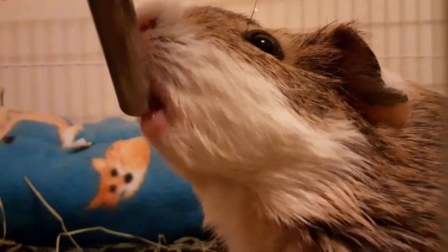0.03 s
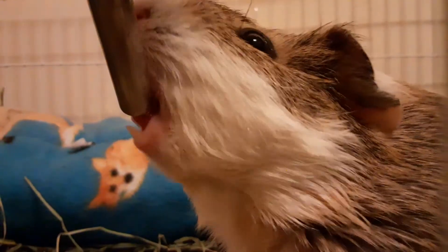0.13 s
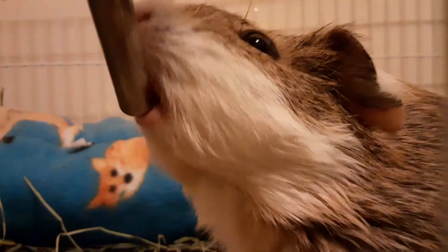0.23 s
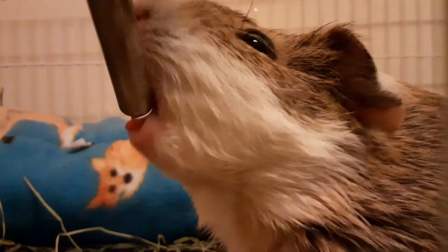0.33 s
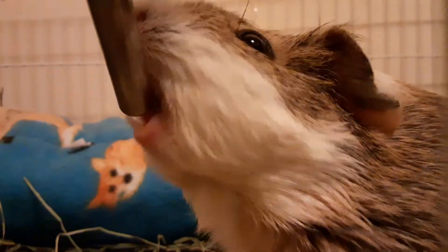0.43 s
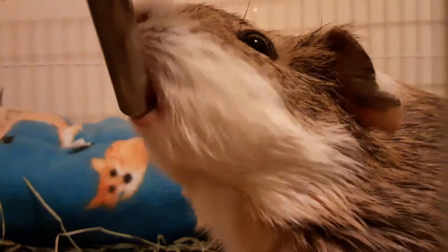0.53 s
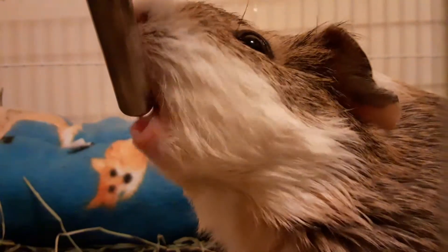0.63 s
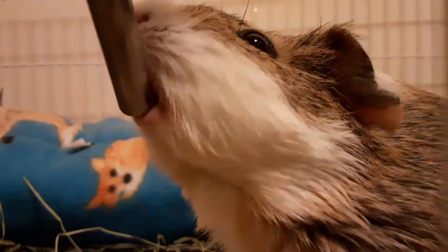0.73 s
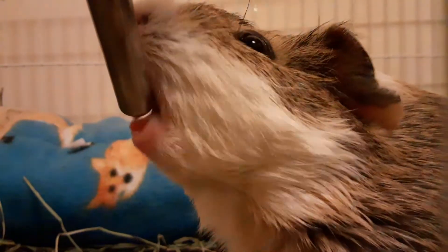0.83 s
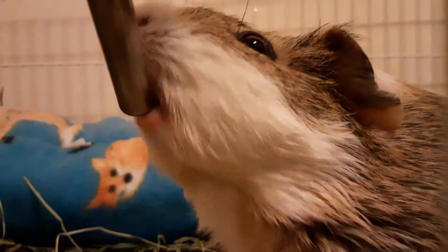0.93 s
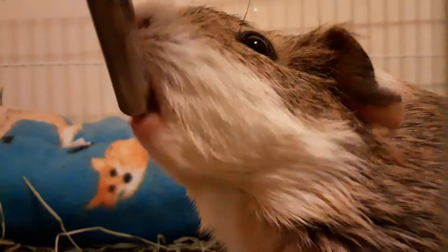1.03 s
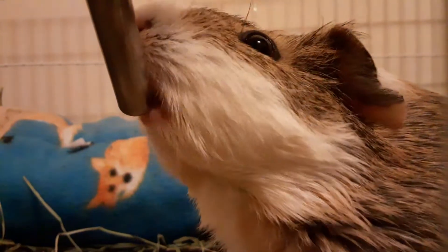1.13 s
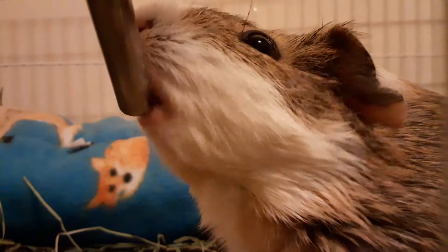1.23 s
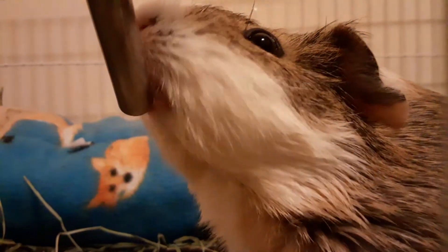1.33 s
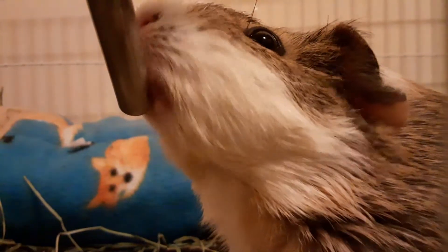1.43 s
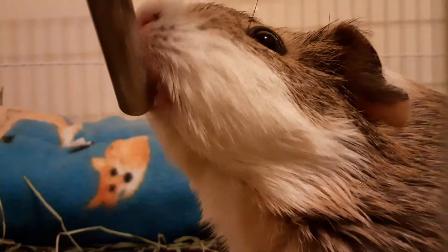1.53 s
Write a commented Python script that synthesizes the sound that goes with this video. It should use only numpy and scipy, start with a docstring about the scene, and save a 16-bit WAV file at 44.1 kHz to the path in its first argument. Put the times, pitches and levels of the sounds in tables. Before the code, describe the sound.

Rapid metallic ticking comes from a water bottle tube as a guinea pig drinks close to the microphone. The bottle rattles lightly on the cage, then the clicks stop with a few soft low bumps over faint room hum.

```python
"""A guinea pig licks the ball valve of a metal drinking spout, close to a two-port microphone.
Quiet room hum and a faint treble rustle run throughout. From 0.14 to 1.17 s the steel ball ticks
in the spout and rings it; harder pushes knock the bottle against the cage wire.
A soft low bump comes at 1.04 s, the bottle's low ring lingers from 1.14 s, and two more bumps
follow at 1.35 and 1.38 s; hum and rustle remain to 1.6 s."""
import sys
import numpy as np
from scipy import signal
from scipy.fft import rfft, irfft, next_fast_len
from scipy.io import wavfile
from scipy.ndimage import map_coordinates

SR = 44100
rng = np.random.default_rng(int(sys.argv[2]) if len(sys.argv) > 2 else 0)


def wav_record(signal):
    """Record a signal, one row per channel, as 16-bit PCM in the file named by sys.argv[1]."""
    frames = np.transpose(np.atleast_2d(signal))
    bounded = np.clip(frames, -1, 1)
    # unit amplitude maps onto the largest positive 16-bit level
    quanta = np.round(bounded * 32767).astype(np.int16)
    wavfile.write(sys.argv[1], SR, quanta)


N = 70560


def amp(db):
    """dB to gain."""
    return 10 ** (np.asarray(db) / 20)


def unit(x):
    """x at rms 1."""
    return x / np.sqrt(np.mean(x ** 2) + 1e-20)


def along(points, hz):
    """Interpolate (Hz, value) points on a log frequency axis."""
    point_hz, values = np.transpose(points)
    return np.interp(np.log(hz + 1), np.log(point_hz + 1), values)


def filtered(x, response):
    """Zero-phase filter with gain response(hz)."""
    n = x.shape[-1]
    padded = next_fast_len(n + 8192)
    return irfft(rfft(x, padded) * response(np.fft.rfftfreq(padded, 1 / SR)), padded)[..., :n]


def hiss(colour, size):
    """Two independent coloured noises, rms 1."""
    hz = np.fft.rfftfreq(size, 1 / SR)
    return unit(irfft(rfft(rng.standard_normal((2, size))) * amp(along(colour, hz)), size))


def burst(t, colour, rise_s, t60_s):
    """Noise burst with the energy of its peak-1 envelope."""
    age_s = t[:2048]
    envelope = amp(-60 * age_s / max(t60_s, 0.002)) * (1 - np.exp(-age_s / max(rise_s, 0.00005)))
    envelope /= envelope.max()
    noise = envelope * hiss(colour, len(age_s))
    noise *= np.linalg.norm(envelope) / np.linalg.norm(noise, axis=1, keepdims=True)
    return np.pad(noise, [(0, 0), (0, len(t) - len(age_s))])


def dying(noise, decay):
    """Noise with a frequency-dependent t60."""
    hz, t, spectra = signal.stft(noise, SR, nperseg=128)
    spectra *= amp(-60 * t / along(decay, hz)[:, None])
    return signal.istft(spectra, SR, nperseg=128)[1][:, :noise.shape[1]]


def ring(modes, t, rise_s):
    """Damped modes, struck nearly in phase at random strengths; low modes waver less in phase."""
    scatter_db, spread_rad, min_rise_s = 1.4, 0.85, 0.00034
    waver_rad, waver_rate_hz, full_waver_hz = 1.96, 252, 8600
    hz, db, t60_s = np.transpose(modes)[:, :, None]
    db = db + scatter_db * rng.standard_normal(db.shape)
    knots = rng.standard_normal((2, len(modes), 100))
    start_rad = np.pi + spread_rad * rng.standard_normal(db.shape)
    age_s = t[t < t60_s.max()]
    position = np.clip(age_s * waver_rate_hz, 0, 98)
    k = position.astype(int)
    wander = knots[..., k] * (1 - position + k) + knots[..., k + 1] * (position - k)
    depth_rad = waver_rad * np.minimum(hz / full_waver_hz, 1) ** 0.82
    swing = np.sin(2 * np.pi * hz * age_s + start_rad + depth_rad * wander)
    ringing = (amp(db - 60 * age_s / t60_s) * swing).sum(axis=1)
    attack = 1 - np.exp(-age_s / max(rise_s, min_rise_s))
    return np.pad(ringing * attack, [(0, 0), (0, len(t) - len(age_s))])


def room_hum():
    """Room tone, alike at both ports only in the bass."""
    # spectrum (frequency [Hz], level [dB])
    colour = [(15, -43), (25, -26), (60, -10), (115, -13.5), (160, -12.5), (185, -8.5), (250, -11.5),
              (340, -2.5), (390, -14.5), (440, -6), (600, -16), (800, -13.5), (1100, -23.5), (1500, -12.5),
              (2500, -18.5), (4000, -27.5), (6000, -44), (12000, -115), (16000, -60)]
    # left-right likeness (frequency [Hz], correlation before clipping [-])
    likeness = [(60, 0.79), (240, 0.77), (950, -0.036), (3770, 0.0097), (15000, -1.4)]

    def mid_side_gains(hz):
        angle_rad = np.arccos(np.clip(along(likeness, hz), -1, 1)) / 2
        return np.array([np.cos(angle_rad), np.sin(angle_rad)])

    mid, side = filtered(hiss(colour, N), mid_side_gains)
    return amp(-52.5) * unit(np.array([mid + side, mid - side]))


def room_echo(direct):
    """Reverberation: a mono sound convolved with a decaying noise per port."""
    # room decay (frequency [Hz], t60 [s])
    decay = [(300, 0.34), (1500, 0.16), (5000, 0.22), (10000, 0.12), (16000, 0.11)]
    n = len(direct)
    tail = dying(rng.standard_normal((2, n)), decay)
    echo = irfft(rfft(direct, 2 * n) * rfft(tail, 2 * n))[:, :n]
    return amp(-10) * echo / np.linalg.norm(tail[0])


def rustle():
    """Grainy treble noise that swells and reaches lower as the animal moves."""
    # swells (time [s], level [dB])
    swells = [(0.0, -61.5), (0.186, -58.5), (0.27, -46.5), (0.4, -58), (0.534, -51), (0.646, -55.5),
              (0.766, -48), (0.918, -58), (0.979, -46), (1.09, -63), (1.22, -59.5), (1.3, -52.5),
              (1.335, -50.5), (1.38, -56.5), (1.6, -60.5)]
    # treble spectrum (frequency [Hz], level [dB])
    treble_colour = [(2000, 3), (6000, -5.5), (9000, -14), (12000, -1.5), (15000, 7), (16500, 0.5)]
    # lower spectrum (frequency [Hz], level [dB])
    lower_colour = [(3000, -20), (7000, -10.5), (9500, 1), (12000, -18), (16500, -7.5)]
    flicker_hz, flicker_db = 150, 1.66
    t = np.arange(N) / SR
    swell_s, swell_db = np.transpose(swells)
    level_db = np.interp(t, swell_s, swell_db)
    flicker = map_coordinates(rng.standard_normal(400), [t * flicker_hz])
    lower = amp(-12.5 + 1.17 * (level_db - swell_db.mean())) * hiss(lower_colour, N)
    return amp(level_db + flicker_db * flicker) * (hiss(treble_colour, N) + lower)


def low_bumps_and_bottle_ring():
    """Three soft low bumps and the bottle's lingering low ring, one damped sine each."""
    # low tones (time [s], level [dB], frequency [Hz], t60 [s])
    tones = [(1.041, -46.5, 140, 0.12), (1.141, -47, 235, 0.31), (1.349, -39, 131, 0.053),
             (1.376, -44.5, 112, 0.047)]
    out = np.zeros(N)
    for start_s, db, hz, t60_s in tones:
        age_s = np.maximum(np.arange(N) / SR - start_s, 0)
        out -= amp(db - 60 * age_s / t60_s) * np.sin(2 * np.pi * hz * age_s)
    return out


def bottle_thud(t):
    """Low bottle modes, slow to build, slightly louder on the left."""
    # bottle modes (frequency [Hz], level [dB], t60 [s])
    modes = [(131.4, -7.5, 0.17), (231.2, 1.5, 0.11), (298.5, -3.5, 0.16), (367.2, 7, 0.13)]
    return ring(modes, t, rise_s=0.0052) * amp([[0.3], [-0.3]])


def wire_knock(t, rise_s):
    """Bottle hits cage wire: a sharp pressure dip and a clack, then ringing and buzz."""
    # wire modes (frequency [Hz], level [dB], t60 [s])
    modes = [(1031, -6, 0.076), (1374, 6, 0.064), (1492, 6.5, 0.04), (1626, 0, 0.076), (2250, -21, 0.023),
             (2531, -1, 0.054), (2630, -4, 0.12), (2970, -7.5, 0.12), (3170, -9.5, 0.12), (3592, 7, 0.029),
             (3960, -2, 0.07), (4640, 0, 0.043), (4780, -15, 0.067), (5550, -5, 0.04), (6340, 4, 0.04),
             (8660, -2, 0.043)]
    # clack and buzz spectrum (frequency [Hz], level [dB])
    colour = [(150, -17.5), (400, -6), (900, -24), (1400, -6.5), (3000, 1), (6000, 0), (8500, -3),
              (10500, -26), (14000, 0.5), (16500, -24)]
    # buzz decay (frequency [Hz], t60 [s])
    decay = [(300, 0.46), (1400, 0.2), (4000, 0.11), (8000, 0.04), (16000, 0.024)]
    dip_width_s = 0.0001094
    offset = t / dip_width_s - 3
    dip = amp(13.5) * (2 * offset ** 2 - 1) * np.exp(-offset ** 2)
    clack = amp(11) * burst(t, colour, rise_s, t60_s=0.01)
    buzz = amp(1.94) * dying(hiss(colour, len(t)), decay)
    return dip + clack + ring(modes, t, rise_s) + buzz


def tube_hollow(t, rise_s):
    """Hollow resonance of the water-filled tube."""
    # tube modes (frequency [Hz], level [dB], t60 [s])
    modes = [(1496, 12.1, 0.013), (1804, 6.2, 0.029), (2050, 3.3, 0.021), (2400, 1.3, .016)]
    return ring(modes, t, rise_s)


def spout_ring(t, rise_s, low_db, mid_db, top_db):
    """The struck metal spout rings in three treble clusters."""
    # spout modes, each table (frequency [Hz], level [dB], t60 [s])
    low_modes = [(10480, 9, 0.025), (10420, -20, 0.081), (10340, 10, 0.035), (10550, 6, 0.023)]
    mid_modes = [(11500, -10, 0.026), (12340, 3.5, 0.026), (11850, -4, 0.027), (13300, -8, 0.038)]
    top_modes = [(13600, -23, 0.025), (14100, 9, 0.032), (13700, -4, .03), (14480, -10, 0.096)]
    clusters = [(low_db, low_modes), (mid_db, mid_modes), (top_db, top_modes)]
    return sum(amp(db) * ring(modes, t, rise_s) for db, modes in clusters)


def ball_tick(t, rise_s, t60_s, tick_db, pop_db):
    """Steel ball hits the spout: a bright burst and a pop, a pressure dip with a slower rebound."""
    # tick spectrum (frequency [Hz], level [dB])
    colour = [(200, -36), (1000, -25), (4000, -31), (9000, -13), (11500, -17.5), (14200, -1.5), (16500, -9)]
    dip_width_s, rebound_s = 0.00005, 0.00065
    dip = np.exp(-(t / dip_width_s - 3) ** 2)
    rebound = t * np.exp(-t / rebound_s)
    pop = rebound * dip.sum() / rebound.sum() - dip  # zero mean
    return amp(tick_db) * burst(t, colour, rise_s, t60_s) + amp(pop_db) * pop


def licking():
    """Each ball contact excites spout, tube, wire, bottle and room; the right port hears it later."""
    # ball contacts (time [s], tick [dB], rise [s], tick t60 [s], pop [dB], low ring [dB],
    # mid ring [dB], top ring [dB], hollow [dB], knock [dB], thud [dB], left over right [dB])
    contacts = [(0.1375, -47, 0.0001, 0.0043, -41, -85, -72.0, -65, -83, -75, -60, 2.0),
                (0.1843, -41, 0.0002, 0.0067, -30, -54, -46, -53, -49, -54, -76, 1.7),
                (0.194, -36, 0.0017, 0.014, -28.5, -65.0, -45, -56.0, -67, -63, -61, 19.4),
                (0.2011, -6.5, 0.00027, 0.0027, -19, -56, -35, -45.0, -64, -47.5, -52.5, 12.3),
                (0.214, -15.5, 0.00032, 0.017, -23, -52, -50.0, -40, -62.0, -46, -44, 2.8),
                (0.2329, -10.5, 0.000091, 0.0019, -15, -39.5, -55, -40, -41.5, -49.5, -76, 16.6),
                (0.2452, -18.5, 0.00017, 0.0083, -36, -43, -58.0, -48.0, -41, -58, -43, 4.4),
                (0.272, -35, 0.00017, 0.006, -44, -60, -64, -62, -68, -59, -71, 9.7),
                (0.3063, -34, 0.00031, 0.0055, -15.5, -40, -36, -43.0, -64, -30, -45, 9.7),
                (0.3119, -14, 0.00043, 0.0034, -13.5, -37.5, -40, -42, -63, -39.5, -39, 5.3),
                (0.3133, -24, 0.0007, 0.0039, -32, -39, -35, -50, -63, -36.5, -42.5, 1.7),
                (0.3145, -19, 0.0002, 0.004, -30, -51, -50, -55, -62, -44, -59, 5),
                (0.3233, -36, 0.0014, 0.011, -37.0, -55.0, -55.0, -56.0, -65, -55, -58, 1.5),
                (0.4358, -43.0, 0.00014, 0.006, -28.5, -55, -59, -55, -51, -55, -47.5, 7.6),
                (0.44, -31.5, 0.0014, 0.0066, -38, -58.0, -55.0, -59.0, -67, -55.5, -52, 14.5),
                (0.454, -28, 0.00066, 0.012, -50, -59, -52, -53, -62, -48, -60, 4.7),
                (0.4603, -6.5, 0.00012, 0.0017, -13.5, -46, -57, -55, -80, -47.5, -51, 13.2),
                (0.4721, -19, 0.00023, 0.0065, -32, -45, -61, -48, -48, -62, -45.5, 7.3),
                (0.4768, -43, 0.0029, 0.012, -43, -37, -57.0, -53, -42, -48, -47, 1.4),
                (0.516, -33, 0.009, 0.016, -39, -62.0, -57, -55.0, -79, -51.5, -53, 7.7),
                (0.529, -34, 0.00022, 0.006, -37, -72.0, -66.0, -68, -71, -64, -77, 5.9),
                (0.5737, -20.5, 0.00022, 0.0089, -41, -46, -35, -43, -36, -35.5, -43.5, 11.4),
                (0.5796, -13.5, 0.00015, 0.0087, -29, -35.5, -42, -30, -51, -34, -42, 2.8),
                (0.5821, -33, 0.0002, 0.005, -47, -60, -55, -55, -48, -44, -65, 6.8),
                (0.587, -49, 0.002, 0.011, -49, -63, -59, -50, -53, -53, -52, 4.4),
                (0.675, -30, 0.0015, 0.0039, -23.5, -71, -64, -57, -50, -52, -62, 3.4),
                (0.6816, -10.5, 0.00013, 0.0033, -14.5, -46, -54, -56.0, -50, -52, -50, 14.6),
                (0.6987, -16, 0.0004, 0.0048, -31, -40, -56.0, -54.0, -45, -50.5, -61, 11),
                (0.711, -14, 0.00022, 0.01, -14, -36, -57, -48, -35, -45, -43, 11.2),
                (0.7287, -18.5, 0.00026, 0.0039, -25, -36, -56, -47.0, -42, -56, -54, 4.6),
                (0.7933, -21, 0.00041, 0.0093, -32, -41, -48.0, -40, -62, -32, -47, 13),
                (0.7987, -15.5, 0.0012, 0.0046, -20, -35.5, -41, -46, -51, -34.5, -43, 11.5),
                (0.8001, -17.5, 0.00042, 0.0052, -14, -35, -51, -46.0, -45, -36, -39, 3.8),
                (0.8037, -38, 0.0002, 0.004, -32, -55, -55, -55, -64, -48, -75, 5.3),
                (0.8102, -46, 0.0032, 0.012, -44, -59, -57, -48, -61, -47, -51, 3),
                (0.902, -27, 0.0011, 0.012, -22, -48, -28, -48.0, -57, -50, -60, 10),
                (0.9086, -12.5, 0.00021, 0.0049, -13.5, -59, -54.0, -57.0, -73, -50, -68, 14.6),
                (0.946, -14, 0.0002, 0.0089, -40, -32.5, -51.0, -45, -33, -43, -46.5, 7.2),
                (0.956, -22, 0.00023, 0.0082, -46, -46, -57, -52, -41.5, -64, -51, 9.6),
                (0.982, -23.5, 0.00015, 0.008, -47, -44, -53, -50, -49.5, -52, -54, 6),
                (1.0263, -23, 0.000047, 0.0065, -36, -42.5, -28, -56.0, -37.5, -36, -44.5, 12),
                (1.0332, -23, 0.00056, 0.011, -26, -40.0, -28, -38, -55, -37.5, -81, 4.1),
                (1.037, -25, 0.0015, 0.012, -15.5, -52, -30, -49.0, -64, -46.5, -55, 4),
                (1.095, -34, 0.0014, 0.015, -27.5, -57, -63.0, -62.0, -43, -56, -74, 3.7),
                (1.107, -11.5, 0.00029, 0.0071, -32, -35.5, -59, -54, -46, -49.5, -55, 8.2),
                (1.1136, -31, 0.0036, 0.0069, -52.0, -60, -58.0, -49, -41, -56, -46, 4),
                (1.1262, -19, 0.00037, 0.0031, -36, -43, -54, -51, -52, -45.5, -47, 6.5),
                (1.1299, -26, 0.00016, 0.0037, -43, -46, -60, -51, -43, -70, -64, 14),
                (1.137, -43.0, 0.002, 0.012, -44, -78, -65, -59.0, -49, -50, -63, 2.6),
                (1.1433, -25, 0.000083, 0.0039, -34, -67, -40, -56.0, -43, -41, -64, 6.7),
                (1.156, -39, 0.0023, 0.022, -51, -60, -58, -58, -55, -54, -63, 6),
                (1.167, -33.5, 0.00085, 0.011, -34, -59, -46, -58, -45.5, -50.5, -73, 10.7)]
    port_lag_s = 0.0004
    t = np.arange(6144) / SR
    end_fade = np.clip(10 - 10 * t / t[-1], 0, 1)
    out = np.zeros((2, N + SR))
    for contact in contacts:
        start_s, tick_db, rise_s, t60_s, pop_db, *ring_db, hollow_db, knock_db, thud_db, pan_db = contact
        direct = ball_tick(t, rise_s, t60_s, tick_db, pop_db) + spout_ring(t, rise_s, *ring_db)
        direct += amp(knock_db) * wire_knock(t, rise_s)
        direct += amp(hollow_db) * tube_hollow(t, rise_s)
        panned = direct * amp([[pan_db / 2], [-pan_db / 2]])
        sound = panned + room_echo(direct[0]) + amp(thud_db) * bottle_thud(t)
        for port in (0, 1):
            first = round((start_s + port * port_lag_s) * SR)
            out[port, first:first + len(t)] += sound[port] * end_fade
    return out[:, :N]


def scene():
    """Licking, bumps and bottle ring over band-limited hum and rustle."""
    background = filtered(room_hum() + rustle(), lambda hz: hz < 15900)
    return background + low_bumps_and_bottle_ring() + licking()


def record(dry):
    """Microphone colour and band limit."""
    # microphone response (frequency [Hz], gain [dB])
    response = [(20, -12), (70, 0), (9000, -4.5), (10400, -3.5), (11250, -1), (11800, 0.5), (14300, -5.5),
                (15000, -4.5), (16500, -23.5), (16650, -41), (16900, -49)]
    return filtered(dry, lambda hz: amp(along(response, hz)) * (hz < 16900))


dry = scene()
out = record(dry)
wav_record(out)
```